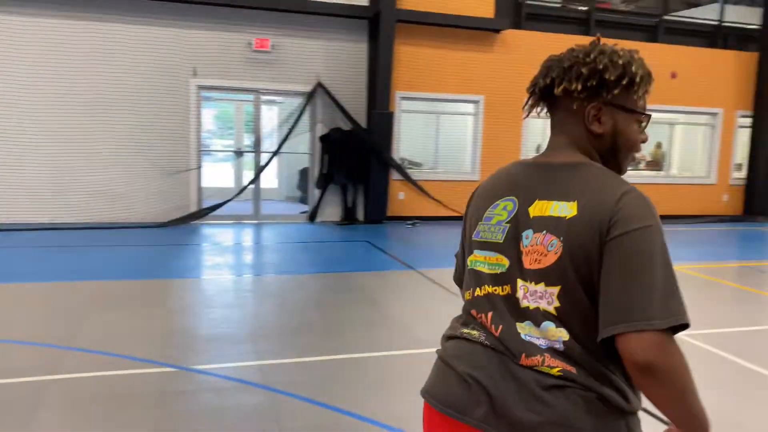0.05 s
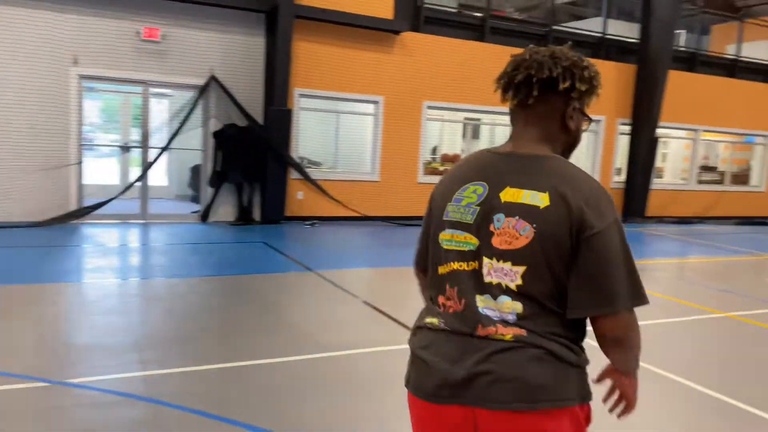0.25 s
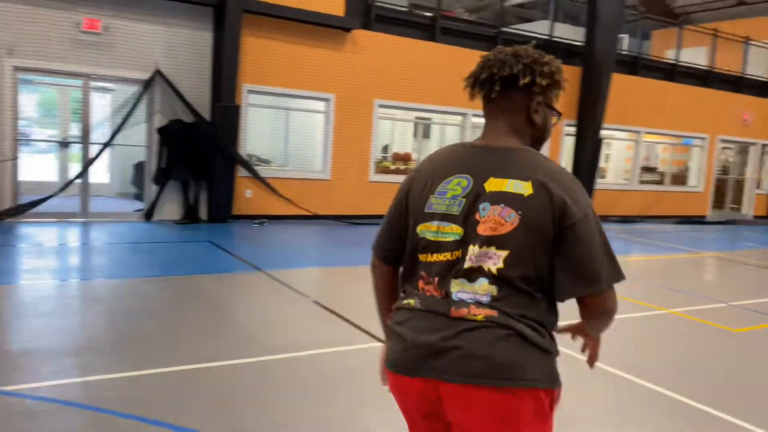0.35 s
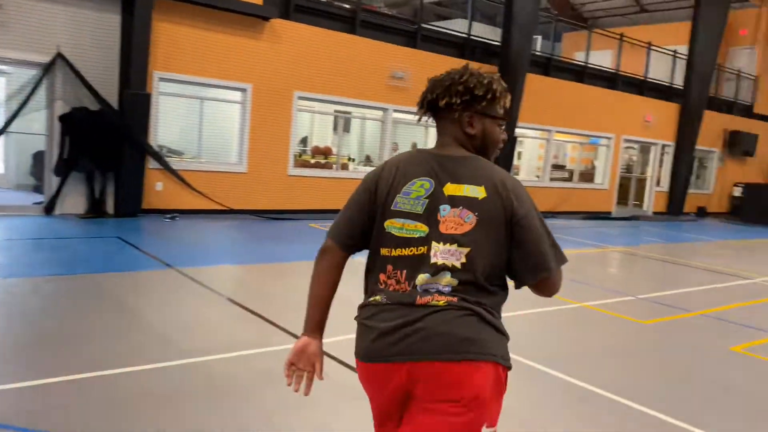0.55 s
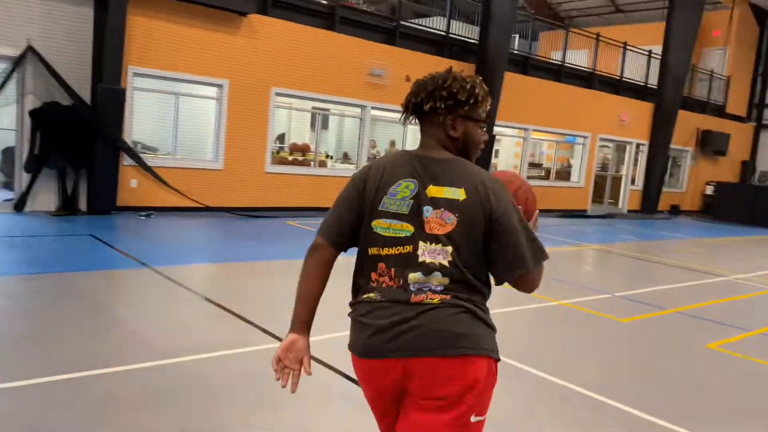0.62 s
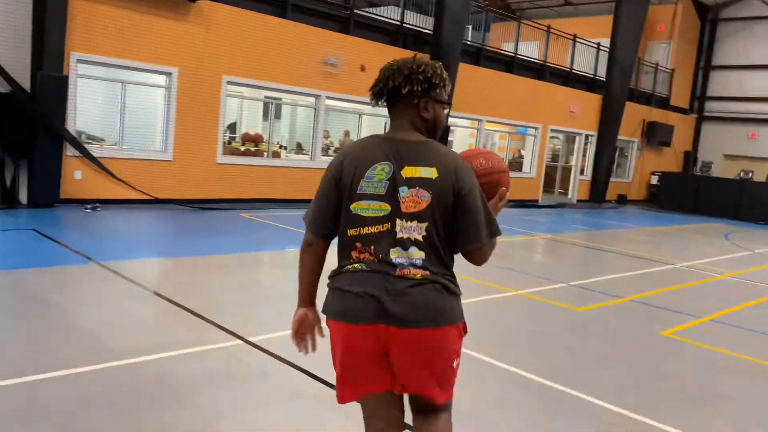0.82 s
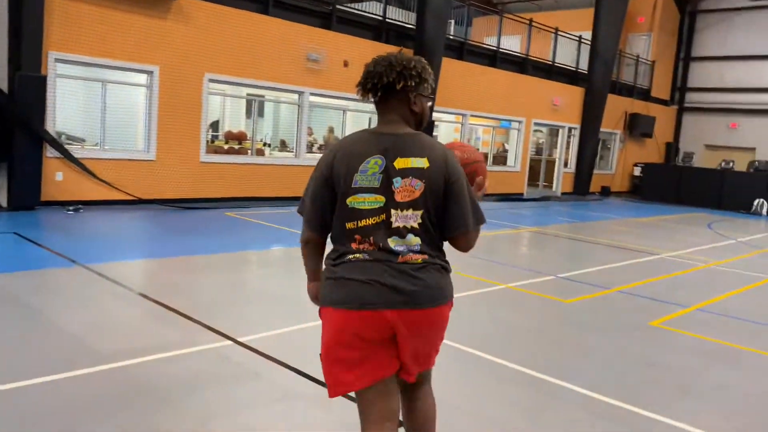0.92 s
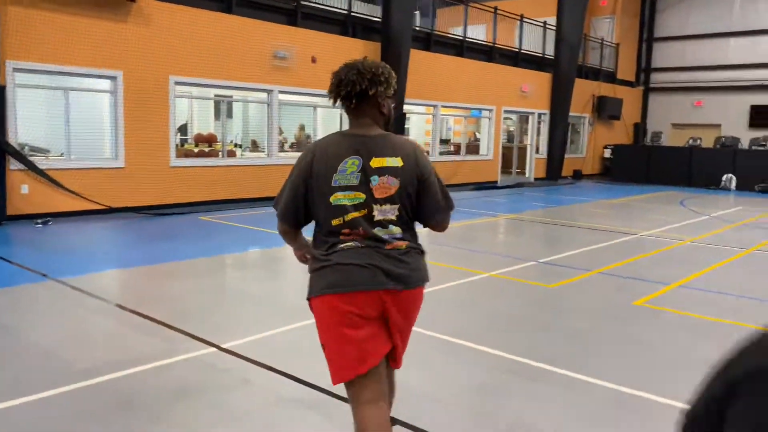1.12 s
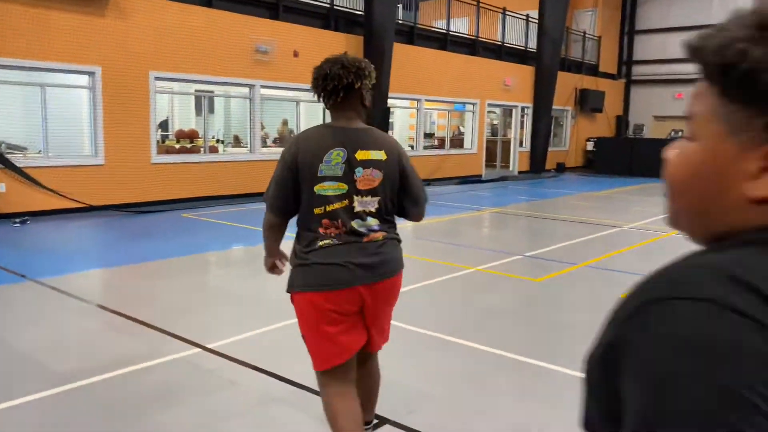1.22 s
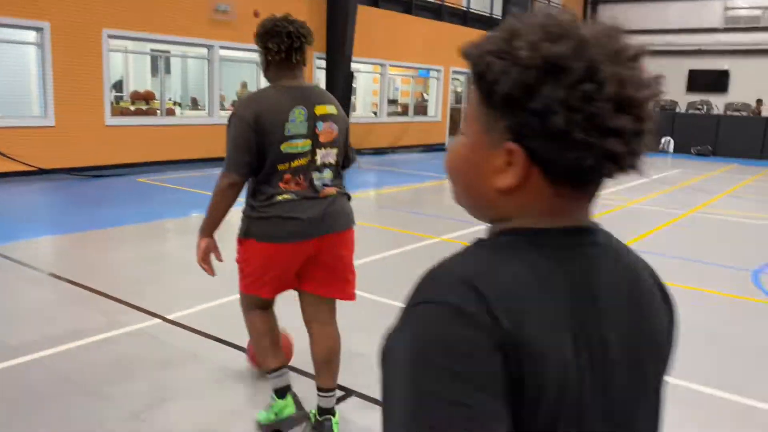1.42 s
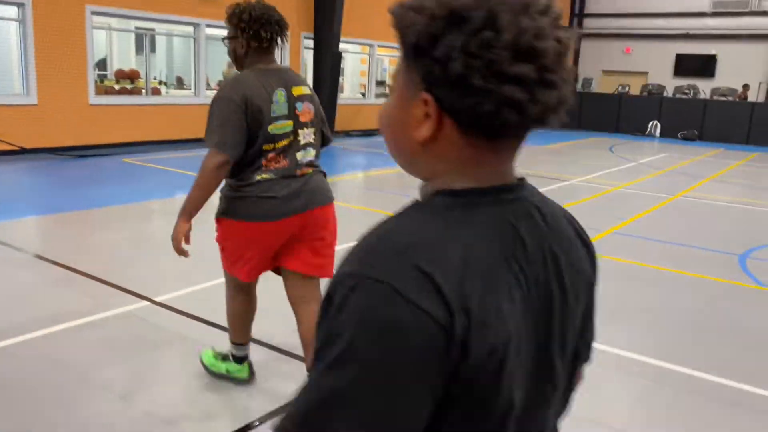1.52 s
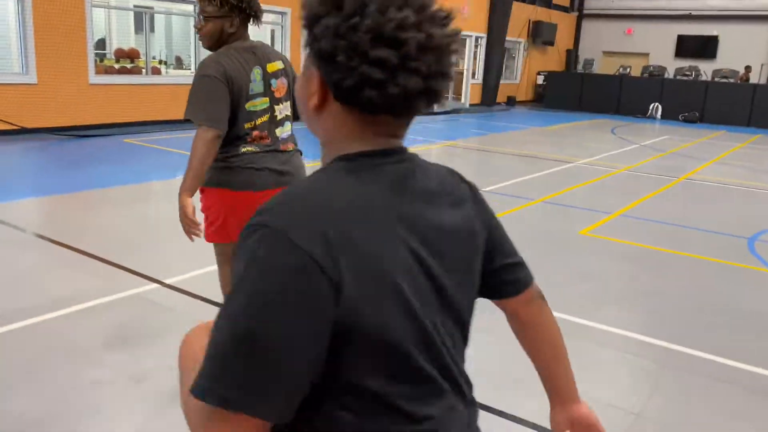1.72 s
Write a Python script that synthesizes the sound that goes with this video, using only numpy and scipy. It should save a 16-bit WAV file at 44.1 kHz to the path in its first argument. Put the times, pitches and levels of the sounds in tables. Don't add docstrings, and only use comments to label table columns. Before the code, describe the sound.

Basketball bounces in a reverberant gym: one hard blow early, a light catch, shoe scuffs, tiny squeaks and a brief low drone, then a second, softer blow with a long tail, heard on a phone.

```python
import sys
import numpy as np
from scipy import signal
from scipy.fft import rfft, irfft, next_fast_len
from scipy.io import wavfile
from scipy.ndimage import uniform_filter1d

SR = 44100
rng = np.random.default_rng(int(sys.argv[2]) if len(sys.argv) > 2 else 0)


def dump_mix(stems):
    frames = np.atleast_2d(stems).T
    limited = np.clip(frames, -1, 1)
    pcm = np.round(limited * 32767).astype(np.int16)
    wavfile.write(sys.argv[1], SR, pcm)


def voltage_ratio(level):
    return 10 ** (np.asarray(level, float) / 20)


N = 77175

# (frequency [Hz], density [dB/Hz])
AIR_SPECTRUM = [(30, -38), (55, 5), (110, 0.5), (250, -7.5), (800, -20.5), (5000, -25), (6000, -35),
                (14000, -63)]
# (frequency [Hz], density [dB/Hz])
RASP_SPECTRUM = [(1500, -19), (3500, -1), (5000, 0), (6000, -8), (9300, -13), (12000, -22.5), (14000, -30),
                 (16000, -59)]
# (frequency [Hz], width [Hz], level [dB])
SQUEAL_LINES = [(14980, 360, 1.5), (15950, 190, -7.5), (9230, 410, -5.5), (11200, 4300, -15.5)]
# (time [s], rasp [dB], squeal [dB])
SCUFF_LEVELS = [(0, -56, -66), (0.188, -62, -60), (.3, -47.5, -73), (.55, -53.5, -92), (.585, -44.5, -51),
                (.65, -41, -67), (.7, -38.5, -46), (.82, -44, -53), (0.861, -43.5, -43.5),
                (1.001, -48, -52), (1.021, -52.5, -69), (1.244, -56.5, -85), (1.265, -53, -60),
                (1.419, -54.5, -53), (1.53, -43.5, -50), (1.579, -42.5, -56), (1.708, -49.5, -65),
                (1.75, -51, -57)]
# (time [s], length [s], level [dB])
SOLE_SQUEAKS = [(0.681, 0.0088, -37.5), (1.339, 0.011, -43), (1.372, 0.013, -37.5), (1.541, 0.01, -43.5),
                (1.722, 0.024, -56)]
# (time [s], knock pitch [Hz], knock [dB], tick [dB], length [s])
SMALL_CONTACTS = [(.217, 603, -30, -62, 0.0062), (0.558, 659, -30.5, -58, 0.0031),
                  (0.568, 250, -29, -21.5, 0.0032), (0.5895, 300, -38, -25, 0.0014),
                  (0.6, 346, -35, -30, 0.0077), (0.6685, 3800, -22.5, -11, 0.00048),
                  (0.67, 231, -26, -61, 0.0026), (0.697, 519, -29, -40, 0.0025),
                  (.762, 185, -32.5, -58, 0.0056), (0.897, 960, -32, -56, 0.00049),
                  (0.916, 574, -28, -55, 0.0013), (1.078, 704, -31.5, -73, 0.0012),
                  (1.123, 520, -40, -45, 0.00077), (1.14, 200, -30.5, -74, 0.0073),
                  (1.286, 400, -29.5, -55, 0.0011), (1.34, 3550, -43, -40, 0.0037),
                  (1.541, 135, -28, -59, 0.014), (1.625, 61.5, -21.5, -49, 0.012),
                  (1.642, 400, -31, -42, 0.0021), (1.678, 424, -31, -48, 0.0053),
                  (1.723, 92, -28.5, -49, 0.009)]
# (frequency [Hz], density [dB/Hz])
TICK_SPECTRUM = [(500, 12.5), (2000, -6.5), (5000, 6), (6000, 3), (10000, -4), (13500, -10.5), (15200, -18)]
# (frequency [Hz], T60 [s], level [dB])
HALL_DECAY = [(60.3, 2.2, 11), (135, 2.54, 16.5), (300, 1.23, -0.5), (690, 2.23, -1.5), (1240, 1.76, 3.5),
              (2380, 3.8, -8), (4600, 0.98, -17), (5800, 1.02, -29)]
# (time [s], slap [dB], crack [dB], roof echo delay [s], roof echo [dB])
BOUNCES = [
    (0.2243, 7.5, 4.5, .0487, -16.5),
    (1.4291, 0.5, 0, .0417, -10),
]
# (slap delay [s], fizz [dB], skin ring [Hz], skin ring [dB], skin T60 [s])
CONTACTS = [(0.0047, -13, 2100, -20, 0.0055), (0.00438, 1, 1420, -29, 0.016)]
# (delay after blow [s], sharp part [dB], thump [dB])
WALL_ECHOES = [
    [(.0125, -21.5, -49), (.030, -28, -29), (.0648, -17, -17), (.108, -37, -23.5)],
    [(.0118, -21, -38), (.0682, -19, -27), (.1045, -25, -20.5)],
]
# (frequency [Hz], width [Hz], level [dB])
THUMP_PEAKS = [(101.5, 68, 31), (275, 46, 24), (61.5, 115, 9.5)]
# (frequency [Hz], width [Hz], level [dB])
SLAP_PEAKS = [(590, 390, 14.5), (1230, 120, -15), (2090, 110, -18)]
# (frequency [Hz], level [dB], T60 [s])
AIR_MODES = [(1096, -35.5, 0.07), (1190, -60, 0.15), (1502, -55.5, 0.11), (2163, -61, 0.089),
             (2556, -98, 0.23)]
# (frequency [Hz], density [dB/Hz])
CRACK_SPECTRUM = [(500, 7), (1500, 5), (3000, 1), (4800, -17), (7000, -4.5), (11000, -19.5), (15000, -27)]
# (frequency [Hz], density [dB/Hz])
FIZZ_SPECTRUM = [(2000, -13), (4000, 7), (6500, 3.5), (9000, 4), (11500, -34), (15000, -7)]
# (frequency [Hz], level against right [dB], likeness to right [0-1])
LEFT_MIC = [(50.3, -8.5, 1), (115, -10.5, 1), (250, -18.5, 0), (400, -12.5, 1), (830, -5, 0.54),
            (1330, -6, 0.89), (2570, -21.5, 0), (4660, -21.5, 0.76), (7800, -6.5, 0.83)]
# (frequency [Hz], width [Hz], depth [dB])
LEFT_DIPS = [(3670, 320, -5), (4530, 420, -2.5), (8140, 73, -14)]

THUMP_DB, TAIL_DB = (6, 4), (3, 3.5)
LEAD = 64


def evened(x):
    return x / np.sqrt(np.mean(x ** 2) + 1e-20)


def read(points, hz, order=1):
    rows = np.transpose(points)
    return np.interp(np.log(hz + 1), np.log(rows[0] + 1), rows[order])


def peaks(rows, hz):
    return sum(voltage_ratio(db) * np.exp(-((hz - f) / w) ** 2) for f, w, db in rows)


def add(mix, s, sound):
    part = mix[round(s * SR):][:len(sound)]
    part += sound[:len(part)]


def coloured(x, points):
    return irfft(rfft(x) * voltage_ratio(read(points, np.fft.rfftfreq(len(x), 1 / SR))), len(x))


def patchy(points, patchy_db):
    a, b, patches = rng.standard_normal((N // 128 + 6, 257, 3)).T
    patches = uniform_filter1d(patches, size=6, axis=0)
    patches = evened(uniform_filter1d(patches, size=14, axis=1))
    cells = (a + 1j * b) * voltage_ratio(patchy_db * patches)
    x = signal.istft(cells, nperseg=512, noverlap=384)[1][:N]
    return evened(coloured(x, points))


def machines():
    drone_hz, hum_hz = 95, 59
    start_s, rise_s, length_s, fall_s = 1.105, 0.064, 0.34, 0.017
    air_db, drone_db, sag_db, under_db, hum_db = -40.5, -25, -9.5, -4.5, -45
    t = np.arange(N) / SR
    waver = evened(uniform_filter1d(rng.standard_normal((2, N)), size=1500, axis=1))
    u = t - start_s
    swell = np.clip(u / rise_s, 0, 1) * np.clip((length_s - u) / fall_s, 0, 1)
    swell = swell * voltage_ratio(drone_db + sag_db * u / length_s)
    drone = voltage_ratio(3.4 * waver[0]) * swell * np.sin(2 * np.pi * drone_hz * t)
    hum_level = voltage_ratio(hum_db) + voltage_ratio(under_db) * swell
    hum = hum_level * voltage_ratio(2 * waver[1]) * np.sin(2 * np.pi * hum_hz * t)
    return voltage_ratio(air_db) * patchy(AIR_SPECTRUM, patchy_db=2) + np.sqrt(2) * (drone + hum)


def scuff():
    grit_db, attack_s, release_s = 1.5, 0.0022, 0.0073
    s, rasp_db, squeal_db = np.transpose(SCUFF_LEVELS)
    t, hz = np.arange(N) / SR, np.fft.rfftfreq(N, 1 / SR)
    flat = patchy([(0, 0), (1, 0)], patchy_db=-2.0)
    squeal = evened(irfft(rfft(flat) * peaks(SQUEAL_LINES, hz), N))
    grit = voltage_ratio(grit_db * evened(uniform_filter1d(rng.standard_normal(N), size=300)))
    press = np.zeros(N)
    for at_s, length_s, db in SOLE_SQUEAKS:
        rise = np.clip((t - at_s) / attack_s, 0, 1)
        fall = np.clip((at_s + length_s - t) / release_s + 1, 0, 1)
        press += voltage_ratio(db) * rise * fall
    squeal = (press + voltage_ratio(np.interp(t, s, squeal_db))) * squeal
    rasp = voltage_ratio(np.interp(t, s, rasp_db)) * patchy(RASP_SPECTRUM, patchy_db=2.0)
    return grit * (squeal + rasp)


def hall():
    rise_s, early_db, early_s = 0.0082, 4.5, 0.019
    hz, t, z = signal.stft(rng.standard_normal(int(1.6 * SR)), SR, nperseg=512)
    gain = voltage_ratio(read(HALL_DECAY, hz, order=2)[:, None] - 60 * t / read(HALL_DECAY, hz)[:, None])
    tail = signal.istft(z * gain, SR, nperseg=512)[1]
    t = np.arange(len(tail)) / SR
    return tail * np.minimum(t / rise_s, 1) * voltage_ratio(early_db * np.exp(-t / early_s)) / 60


def knocks():
    tail_db = -6
    out, t = np.zeros(N), np.arange(8000) / SR
    noises = rng.standard_normal((len(SMALL_CONTACTS), 2, 8000))
    for (s, hz, knock_db, tick_db, length_s), (noise, drift) in zip(SMALL_CONTACTS, noises):
        shape = np.sqrt(t / length_s) * np.exp(0.5 - t / length_s / 2)
        turns = np.cumsum(hz * (1 + 0.222 * evened(uniform_filter1d(drift, size=150)))) / SR
        tick = evened(coloured(noise, TICK_SPECTRUM))
        tick = tick * np.minimum(t / 0.0003, 1) * np.exp(-t / min(length_s, 0.006))
        add(out, s, voltage_ratio(knock_db) * shape * np.sin(2 * np.pi * turns) + voltage_ratio(tick_db) * tick)
    tail = coloured(hall(), [(50, -18), (200, -11), (1200, -2.5), (5000, 13.0)])
    return out + voltage_ratio(tail_db) * signal.fftconvolve(out, tail)[:N]


def blow(thump_db, slap_db, crack_db, slap_s, fizz_db, skin_hz, skin_db, skin_t60):
    lag_s, lag_power, lag_turn = 0.0171, 0.65, 3.15
    all_crack_db, fizz_s, ground_s, ground_db = -13.5, 0.00025, 0.001475, -5.5
    near_hz, near_db, near_s = 2950, -29, 0.0084
    t, hz = np.arange(8192) / SR, np.fft.rfftfreq(8192, 1 / SR)
    turn = 2 * np.pi * lag_s * 110 * (hz / 110) ** (1 - lag_power) / (1 - lag_power)
    thump = irfft(voltage_ratio(thump_db) * peaks(THUMP_PEAKS, hz) * np.exp(1j * (lag_turn - turn)))
    slap = -irfft(voltage_ratio(slap_db) * peaks(SLAP_PEAKS, hz) * np.exp(-2j * np.pi * slap_s * hz))
    burst, near = rng.standard_normal((2, 8192))
    ground = 1 + voltage_ratio(ground_db) * np.exp(-2j * np.pi * hz * ground_s)
    crack = -3 * irfft(voltage_ratio(read(CRACK_SPECTRUM, hz)) * ground)
    fizz = voltage_ratio(fizz_db) * np.roll(coloured(burst, FIZZ_SPECTRUM) * np.exp(-t / fizz_s), -12)
    skin = -voltage_ratio(skin_db - 60 * t / skin_t60) * np.cos(2 * np.pi * skin_hz * t)
    sharp = slap + skin + voltage_ratio(all_crack_db + crack_db) * (crack + fizz)
    sharp = np.roll(sharp, LEAD) * (t < 0.1)
    near = coloured(near, [(near_hz, 0), (9000, -14)]) * np.exp(-t / near_s)
    sharp = sharp + voltage_ratio(near_db) * signal.fftconvolve(sharp, near)[:8192]
    return np.roll(thump, LEAD) * np.minimum(1, 5 * (1 - t / t[-1])), sharp


def ball():
    ball_db, echo_thump_db, smear_s = 8, -4.5, 0.0063
    out, t = np.zeros(N), np.arange(9000) / SR
    u = t[:1500]
    for bounce, contact, walls, thump_db, tail_db in zip(BOUNCES, CONTACTS, WALL_ECHOES, THUMP_DB, TAIL_DB):
        s, slap_db, crack_db, roof_s, roof_db = bounce
        thump, sharp = blow(thump_db, slap_db, crack_db, *contact)
        ring = sum(voltage_ratio(db - 60 * t / t60) * np.sin(2 * np.pi * f * t) for f, db, t60 in AIR_MODES)
        add(out, s - LEAD / SR, thump + sharp)
        add(out, s, voltage_ratio(slap_db) * ring)
        roof = (roof_s, roof_db, roof_db + echo_thump_db)
        for lag_s, db, low_db in [roof] + list(walls):
            smear = 0.063 * rng.standard_normal(1500) * np.exp(-u / smear_s) + (u == 0)
            echo = voltage_ratio(db) * signal.fftconvolve(sharp, smear)[:8192] + voltage_ratio(low_db) * thump
            add(out, s + lag_s - LEAD / SR, echo)
        add(out, s + roof_s, voltage_ratio(tail_db) * hall())
    return voltage_ratio(ball_db) * out


def scene():
    return np.tile(ball() + knocks() + scuff() + machines(), (2, 1))


def top_cut(x):
    return signal.sosfilt(signal.butter(12, 17000, fs=SR, output="sos"), x)


def record(dry):
    cross_hz, edge_hz, low_cut_hz = 8100, 15830, 62.6
    left_lag_s, left_turn, top_lead_s, top_turn = 0.0003, 2.2, 9.7 / SR, 2.67
    fold_turn, sudden = 0.8, 3
    notch_hz, notch_width_hz, notch_db = 5580, 620, -7
    size = next_fast_len(N + 4096)
    hz = np.fft.rfftfreq(size, 1 / SR)
    source, right = rfft(dry[0], size), rfft(dry[1], size)

    loose = rfft(rng.standard_normal(600) * np.exp(-np.arange(600) / SR / 0.0022), size)
    loose = source * loose / np.sqrt(uniform_filter1d(abs(loose) ** 2, size=300))
    like = np.clip(read(LEFT_MIC, hz, order=2), 0, 1)
    turn = left_turn * np.clip(0.79 + hz / 1500, 0, 1) + 2 * np.pi * hz * left_lag_s
    path = like * np.exp(-1j * turn) * source + np.sqrt(1 - like ** 2) * loose
    dips_db = sum(db * np.exp(-((hz - f) / w) ** 2) for f, w, db in LEFT_DIPS)
    low = voltage_ratio(read(LEFT_MIC, hz) + dips_db) * path

    top = 1 / (1 + np.exp((cross_hz - hz) / 40))
    turn = 2 * np.pi * hz * top_lead_s - top_turn
    whole = np.pi * np.round(turn / np.pi)
    folded = np.where(abs(turn - whole) < fold_turn * hz / 10000, whole, turn)
    left = (1 - top) * low + top * np.exp(1j * np.array([folded, turn])) * right

    edge = 1 / (1 + np.exp((hz - edge_hz) / 20))
    edge = np.array([edge, edge + voltage_ratio(-22) * (1 - edge) * (hz < 17000)])
    notch = voltage_ratio(notch_db * np.exp(-((hz - notch_hz) / notch_width_hz) ** 2))
    low_cut = np.sqrt(1 + (low_cut_hz / (hz + 1)) ** 8)
    both = irfft(np.array([left, [right, right]]) * edge * notch / low_cut, size)[..., :N]

    power = irfft(right * top * (hz < 14000), size)[:N] ** 2
    usual = np.roll(uniform_filter1d(power, size=1500), 850)
    attack = uniform_filter1d(power, size=200) > sudden * usual
    attack = np.clip(3 * uniform_filter1d(1.0 * attack, size=700), 0, 1)
    out = both[:, 0] + attack * (both[:, 1] - both[:, 0])
    mix = 0.31 * np.tanh(out / 0.94) + 0.73 * out
    return top_cut(mix)


dry = scene()
out = record(dry)
dump_mix(out)
```